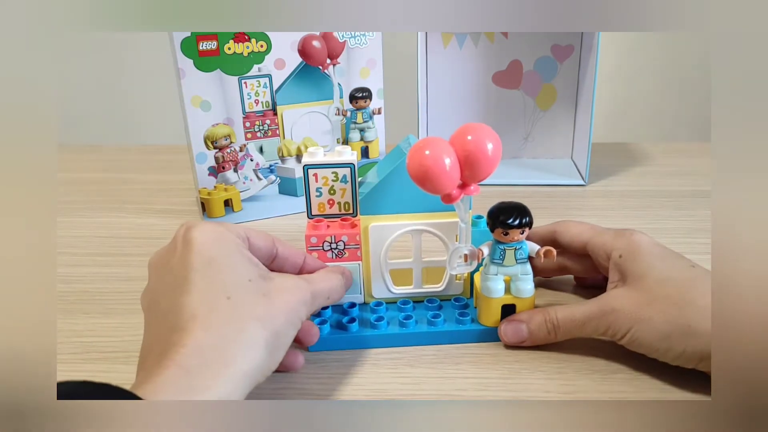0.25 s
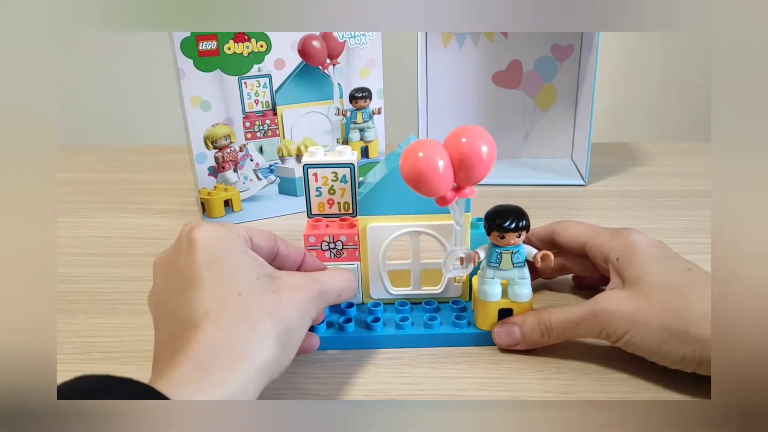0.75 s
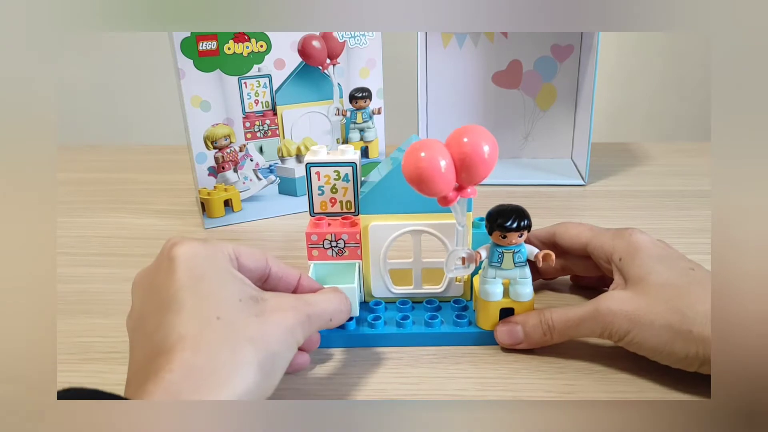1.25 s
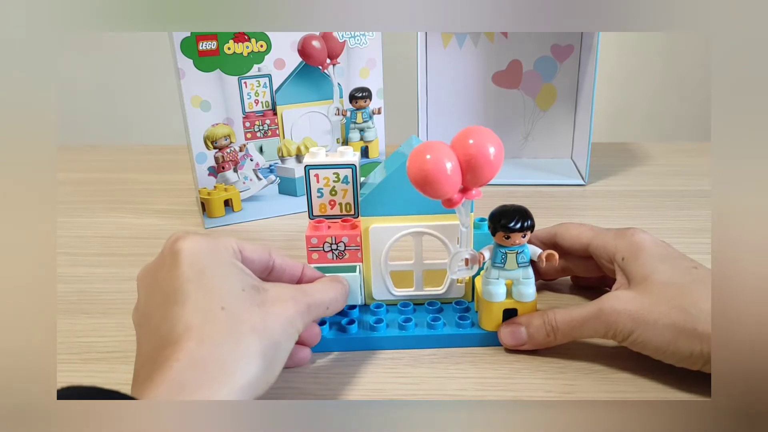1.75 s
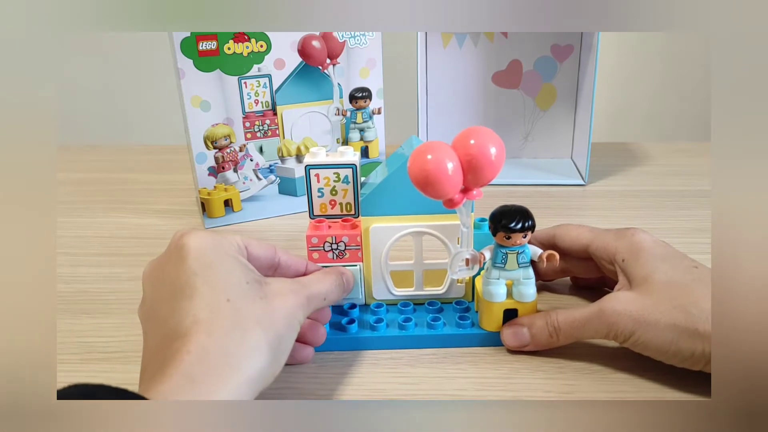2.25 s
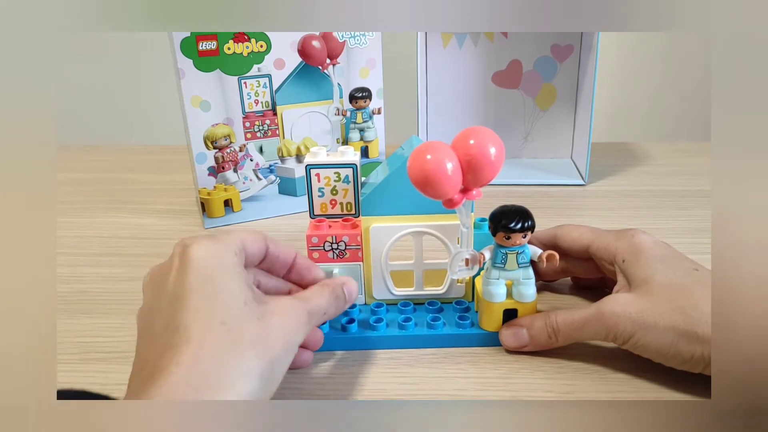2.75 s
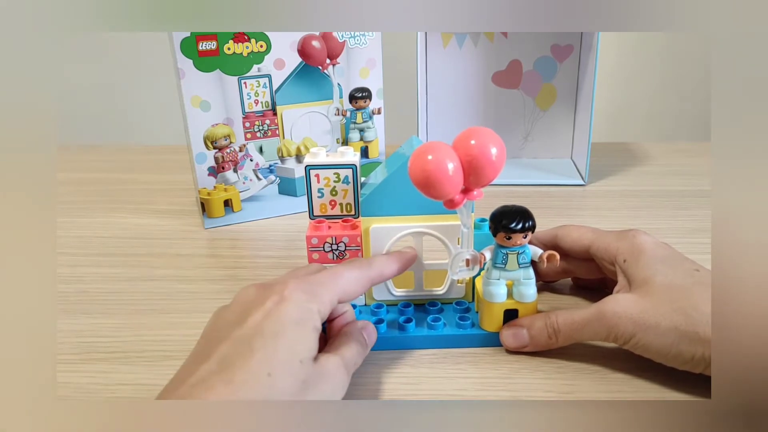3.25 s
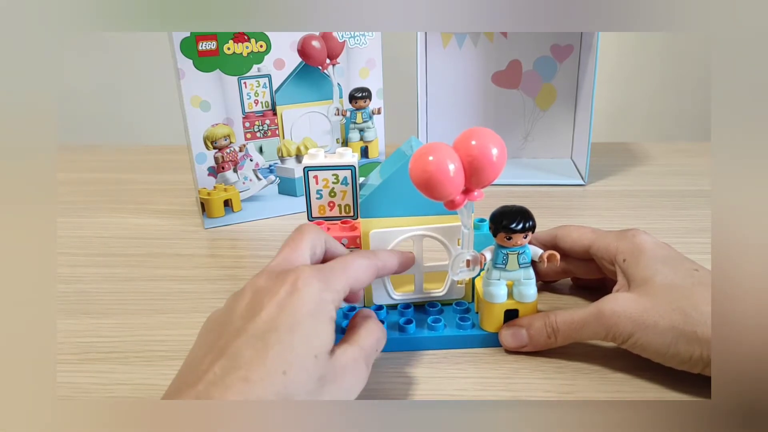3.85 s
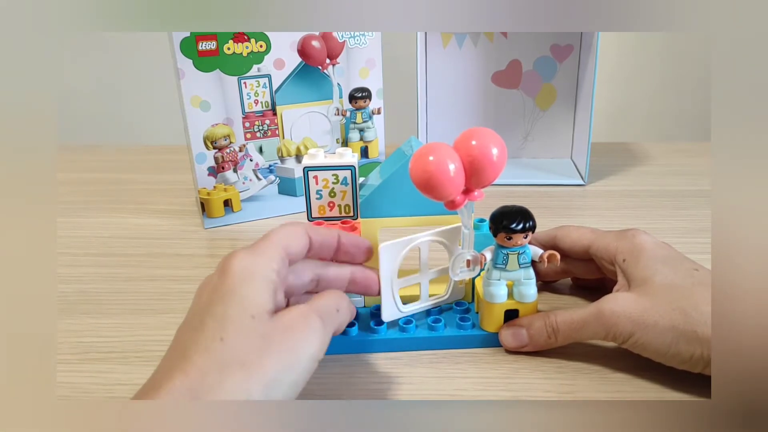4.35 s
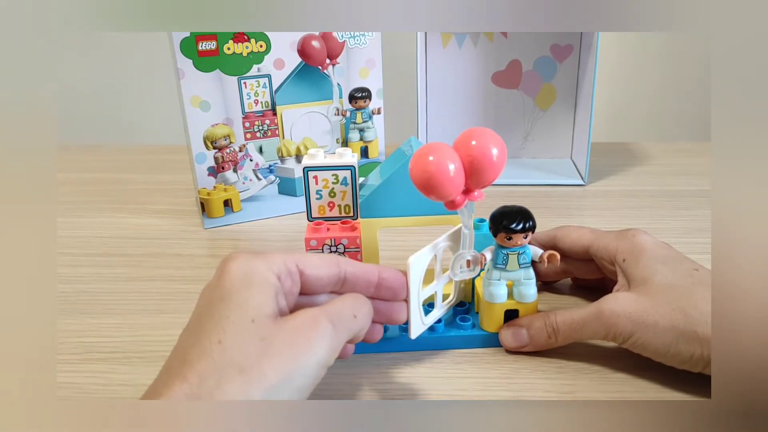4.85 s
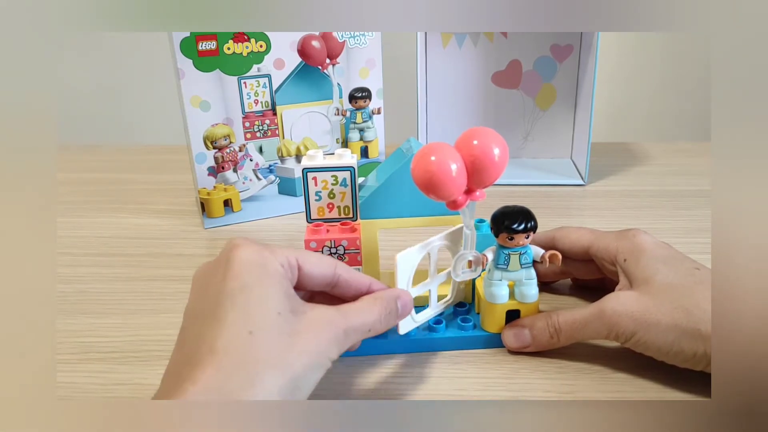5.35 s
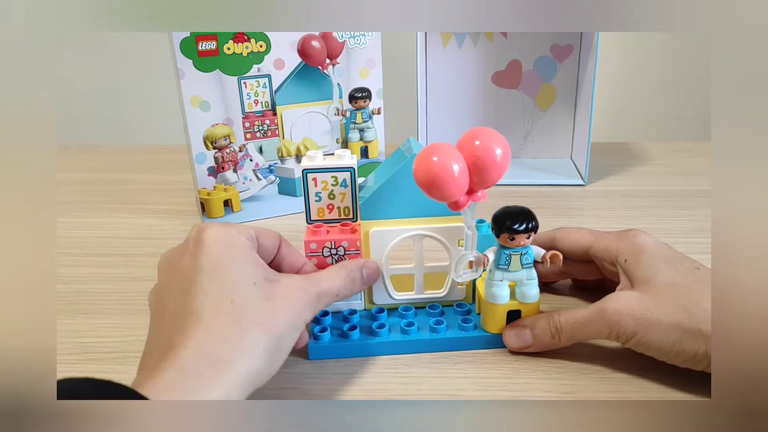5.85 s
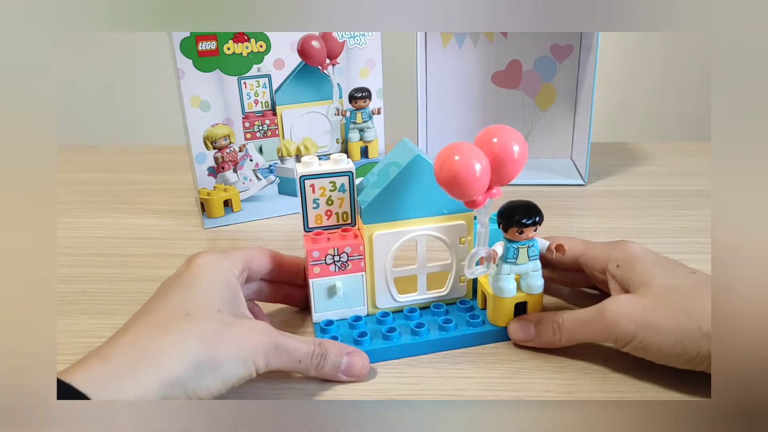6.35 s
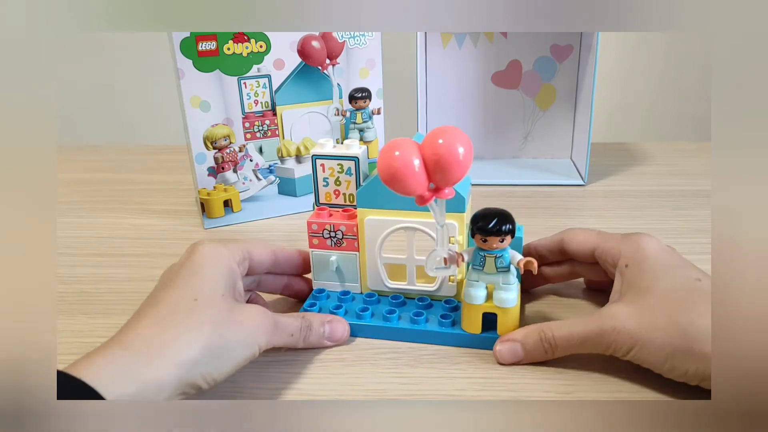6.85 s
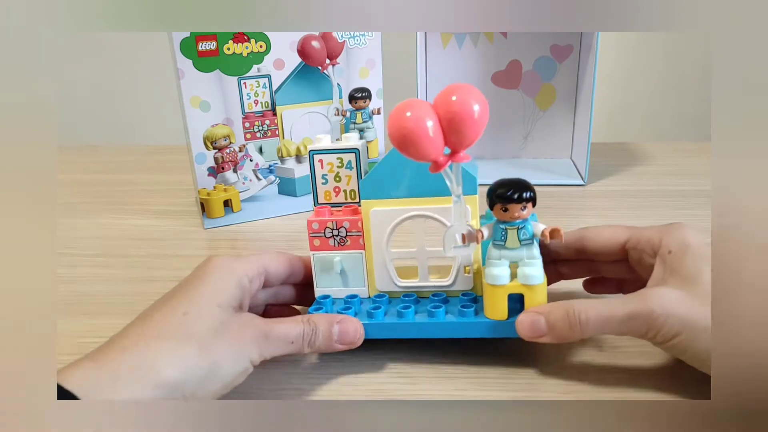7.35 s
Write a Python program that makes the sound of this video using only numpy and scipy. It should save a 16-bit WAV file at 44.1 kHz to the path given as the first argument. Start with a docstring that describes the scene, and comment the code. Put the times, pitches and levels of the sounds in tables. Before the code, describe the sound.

Hands handle a small plastic brick house on a wooden table: light clicks, a drawer thud, a creaking door popping open, faint hum and hiss.

```python
"""Hands play with a small house of plastic toy bricks on a wooden table, in a bare, lively room.
Contacts set the table, plate, walls, bricks and edges ringing as damped modes; a drawer thuds on its stop,
a pressed door groans and springs open, and the base plate skips over the table.
Fingers and sliding parts rub as shaped noise. Behind them lie a low hum, a thin whine and faint hiss;
all is heard through two microphone ports, each with its own resonance."""
import sys
import numpy as np
from scipy import signal
from scipy.fft import rfft, irfft, next_fast_len
from scipy.io import wavfile
from scipy.ndimage import uniform_filter1d, map_coordinates

SR = 44100
rng = np.random.default_rng(int(sys.argv[2]) if len(sys.argv) > 2 else 0)


def wav_out(sig):
    """Save sig, one row per channel (or a flat mono array), as 16-bit PCM at SR to the path in sys.argv[1]."""
    wavfile.write(sys.argv[1], SR, np.round(np.clip(np.atleast_2d(sig).T, -1, 1) * 32767).astype(np.int16))


N = 334895

# Contacts of the plastic parts. Each row: time in seconds, strength in dB before the trim of each part,
# hardness in dB (hard edge +, soft bump -), hollowness in dB (hollow wall +, solid rim -),
# wall mode of the touched spot in Hz, its level in dB, edge mode in Hz, its level in dB (before the spot trims).
TOUCHES = [(0.111, -76, 11, -6, 3380, -67.5, 7000, -71), (0.211, -71, -9, 6, 1150, -59.5, 7630, -80),
           (0.629, -63.5, 7, 1, 1770, -70, 7300, -62), (0.885, -73, 9.5, 11.5, 2920, -74, 4880, -73),
           (1.033, -55.5, 9, 0, 1230, -51, 4730, -59), (1.045, -47.5, 6.5, 2.5, 1170, -47, 8940, -53),
           (1.05, -42, 5, -1, 1150, -39, 4950, -47), (1.063, -41.5, 3.5, -4.5, 1150, -44.5, 7400, -43.5),
           (1.078, -56, 0, -6, 2140, -52, 7350, -60), (1.111, -58.5, 7, 8.5, 1000, -60, 7160, -64),
           (1.131, -50.5, 6.5, -1, 1920, -51, 7300, -52), (1.798, -59, -8, 2, 534, -58, 7500, -73),
           (1.815, -61.5, 1.5, -14, 563, -54, 5700, -65), (1.915, -66, 7, 14, 1150, -52.5, 6200, -67),
           (2.46, -64.5, 3, -13, 2830, -68, 4640, -67.5), (2.812, -74, -13, 10, 590, -67, 6520, -76),
           (3.618, -69, -10, 1, 644, -63, 5050, -85), (3.655, -66.5, -3, 5.5, 582, -58, 7550, -77),
           (3.919, -40.5, 3.5, -6, 1920, -39.5, 8760, -44), (4.017, -47.5, 2, -10, 1350, -49, 7630, -49),
           (4.034, -51.5, -3.5, 5.5, 815, -52, 5520, -54), (4.247, -63, -11, -10, 520, -52, 7600, -81),
           (4.308, -50.5, -5.5, 2.5, 1216, -39.5, 7200, -69), (4.324, -55, -6.5, 7.5, 626, -44, 4760, -66),
           (4.451, -69, 2, 9, 615, -63, 7730, -75), (4.477, -57, -4.5, 2.5, 985, -60, 8730, -70),
           (4.714, -45.5, -0.5, 9.5, 900, -46, 6200, -55), (5.41, -45.5, -0.5, 2.5, 1150, -46, 4560, -47),
           (5.435, -55.5, -15, -22, 970, -62, 5130, -64), (5.546, -56, 2, 11.5, 1620, -44.5, 4250, -55),
           (5.556, -52, -12, -13, 560, -43, 4200, -69), (5.631, -60, -7.5, 1, 510, -56, 7600, -70),
           (5.714, -63.5, -10.5, 7, 615, -52, 7280, -73), (5.734, -41.5, 10, -7, 3310, -45, 8380, -40),
           (6.082, -47.5, -4.5, -4.5, 635, -47, 5500, -63), (6.36, -50.5, 1.5, -16.5, 624, -57, 7050, -63),
           (6.605, -65, -15, -11, 615, -58, 6120, -73), (6.702, -55, -11, 1.5, 640, -65, 8700, -68),
           (6.93, -57, -5, -17, 1170, -61, 6530, -68), (6.963, -61.5, -2.5, 5.5, 1700, -55.5, 7560, -76),
           (7.069, -51, -10.5, -17, 520, -49, 7700, -62), (7.265, -45.5, 9.5, -11.5, 3250, -45, 8020, -47)]


def amp(db):
    """Decibels to gain."""
    return 10 ** (np.asarray(db) / 20)


def unit(x):
    """Scale to rms 1."""
    return x / np.sqrt(np.mean(x ** 2) + 1e-20)


def along(points, hz):
    """Read a curve of (Hz, value) points on a log frequency axis."""
    point_hz, value = np.transpose(points)
    return np.interp(np.log(hz + 1), np.log(point_hz + 1), value)


def wobble(rate):
    """A smooth random curve, rate knots a second."""
    knots = rng.standard_normal(int(N * rate / SR) + 4)
    return map_coordinates(knots, [np.arange(N) * rate / SR])


def filtered(x, response):
    """x through a complex response of frequency."""
    n = x.shape[-1]
    padded = next_fast_len(2 * n)
    hz = np.fft.rfftfreq(padded, 1 / SR)
    return irfft(rfft(x, padded) * response(hz), padded)[..., :n]


def resonance(hz, centre, width):
    """Causal response of one damped mode, 1 at its centre."""
    return 1j * hz * width / (centre ** 2 - hz ** 2 + 1j * hz * width)


def spread(pair):
    """Two unrelated signals as left and right: nearly mono around 150-300 Hz, far apart elsewhere."""
    # Each row: frequency in Hz, left-right correlation.
    likeness = [(30, 0.081), (150, 0.92), (300, 0.93), (600, 0.047), (1500, 0.14), (4000, 0.036)]

    def mid_side_gains(hz):
        angle = np.arccos(np.clip(along(likeness, hz), -1, 1)) / 2
        return np.array([np.cos(angle), np.sin(angle)])

    mid, side = filtered(pair, mid_side_gains)
    return np.array([mid + side, mid - side])


def noise(spectrum, grain_db):
    """Stereo noise of rms 1; grain_db sets how strongly fast level flutter breaks it into tiny slips."""
    slips = rng.standard_normal((2, N)) * amp(grain_db * wobble(400))
    return unit(spread(filtered(slips, lambda hz: amp(along(spectrum, hz)))))


def strokes(rows, rise_s, fall_s, rest_db):
    """Gain of a sliding sound: each stroke speeds up, holds and eases off; powers add over a resting level."""
    t, power = np.arange(N) / SR, amp(rest_db) ** 2
    for start, length, db in rows:
        speed_up = np.clip((t - start) / rise_s, 0, 1)
        ease_off = np.clip(.5 + (start + length - t) / fall_s, 0, 1)
        power = power + (amp(db) * speed_up * ease_off) ** 2
    return np.sqrt(power)


def ringing(modes, blows, contact_t60, rise, rattle_db, rattle_t60, vary_db):
    """A part rattled at each (s, dB) as left, right and all-round sound; a blow has the energy of 10 ms at its level."""
    size, all_round_delay = SR // 8, SR // 300
    t, out = np.arange(size) / SR, np.zeros((3, N + size))
    # the faces catch and let go in a burst of micro-impacts, then the loose joints chatter more softly
    burst = amp(-60 * t / contact_t60) + amp(rattle_db - 60 * t / rattle_t60)
    force = (1 - np.exp(-(t / rise) ** 2)) * burst
    blow = 1. * (np.arange(size) == all_round_delay)  # leaves room for the zero-phase ring ahead of its peak
    centre, width, mode_db = np.transpose(modes)[..., None]
    sign = (-1) ** np.arange(len(modes))[:, None]
    for s, db in blows:
        strengths = amp(mode_db + vary_db * rng.standard_normal(centre.shape))  # each spot favours other modes

        def each(hz):
            radiated = resonance(hz, centre, centre * 1.4)  # best near the mode's own pitch
            return strengths * resonance(hz, centre, width) * radiated

        impacts = spread(rng.standard_normal((2, size))) * force
        aimed = unit(filtered(impacts, lambda hz: (sign * each(hz)).sum(0)))
        # over all directions the burst acts as one blow and the modes add in power
        all_round = unit(filtered(blow, lambda hz: np.linalg.norm(each(hz), axis=0)))
        level = amp(db) * np.sqrt(.01 * SR / size)
        out[:, round(s * SR):][:, :size] += level * np.vstack([aimed, all_round])
    return out[:, :N]


def struck(modes, blows, soft_s):
    """A panel hit cleanly at each (s, dB): left, right and all-round; left and right carry 10 ms at that rms."""
    size = SR // 4
    t, out = np.arange(size) / SR, np.zeros((3, N + size))
    centre, width, ahead_db, around_db = np.transpose(modes)[..., None]
    sign = (-1) ** np.arange(len(modes))[:, None]
    for s, db in blows:
        ports_db = ahead_db + rng.standard_normal((2, len(modes), 1))  # each port sees the modes a little differently
        strengths = sign * amp(np.concatenate([ports_db, around_db[None]]))

        def panel(hz):
            radiated = resonance(hz, centre, centre)
            return (strengths * resonance(hz, centre, width) * radiated).sum(1)

        ring = filtered(np.exp(-t / soft_s), panel)
        rms_10ms = np.sqrt(np.sum(ring[:2] ** 2) / 2 / (.01 * SR))
        out[:, round(s * SR):][:, :size] += amp(db) * ring / rms_10ms
    return out[:, :N]


def excitation(own_db, hard_share, hollow_share):
    """(s, dB) of one part at every contact: its trim plus its shares of the hardness and hollowness."""
    s, strength_db, hard_db, hollow_db, *_ = np.transpose(TOUCHES)
    return zip(s, strength_db + own_db + hard_share * hard_db + hollow_share * hollow_db)


def background():
    """A low hum that fills the room, a thin, unsteady whine of narrow noise and the microphone's hiss."""
    # Spectra. Each row: frequency in Hz, relative level in dB per Hz.
    hum_spectrum = [(10, 2.5), (28, 0.5), (60, -14.5), (110, -10), (170, -5.5), (228, 8.5), (275, -2.5),
                    (330, -1), (500, -12.5), (800, -18), (1500, -28), (3000, -32.5), (6000, -73)]
    hiss_spectrum = [(300, -28), (2000, 7), (5000, 9.5), (8000, -0.5), (9500, -50), (10500, 8.5),
                     (12500, 19), (13500, -53)]
    hum = amp(-54.5 + 1.3 * wobble(13)) * noise(hum_spectrum, grain_db=-2.5)
    # two passes through one resonance, 90 Hz wide per pass
    whine = unit(filtered(rng.standard_normal(N), lambda hz: resonance(hz, 1600, 90) ** 2))
    hiss = noise(hiss_spectrum, grain_db=1.5)
    return hum + amp(-77.5) * whine + amp(-77.0) * hiss


def room(x, build):
    """The diffuse answer of the walls as decaying noise, drawn afresh each quarter second."""
    # Each row: frequency in Hz, time to fall 60 dB in seconds.
    decay = [(100, 0.41), (300, 0.74), (700, 0.63), (2000, 0.7), (4000, 0.63), (8000, 0.56), (12000, 0.23)]
    size, step = SR * 3 // 4, SR // 4
    out = np.zeros((2, N + size + step))
    age = np.arange(size) / SR
    early = amp(-9.5) * np.exp(-age / 0.022)  # first answers of the table and near walls
    swell = (1 - np.exp(-age / build)) * (1 + early)
    for start in range(0, N, step):
        hz, t, z = signal.stft(rng.standard_normal((2, size)), SR, nperseg=256)
        t60 = along(decay, hz)[:, None]
        fading = z * amp(-60 * t / t60) / np.sqrt(t60)
        tail = signal.istft(fading, SR, nperseg=256)[1][:, :size]
        tail = unit(spread(tail) * swell) / np.sqrt(size)
        answer = signal.fftconvolve(x[None, start:start + step], tail, axes=1)
        out[:, start:start + answer.shape[1]] += answer
    return out[:, :N]


def standing_waves(x):
    """The room keeps ringing at a few pitches of its own, alike at both ports."""
    # Each row: frequency in Hz, width in Hz, gain in dB.
    room_tones = [(243.5, 3.1, 13), (298, 2.5, 9), (343, 2.4, 1), (380, 2.3, 5), (413, 4, 7.5),
                  (475, 4.4, 9), (525, 1.5, 6), (604, 3.1, 2.5), (899, 3.7, 4), (974, 6.3, 3),
                  (1009, 6.2, 0), (1177, 2.4, 3.5)]
    return filtered(x, lambda hz: sum(amp(db) * resonance(hz, centre, width) for centre, width, db in room_tones))


def rubbing():
    """Fingertips whisper over the plastic as noise; the holding hand never quite rests."""
    # Each row: start in seconds, length in seconds, level in dB before the trim below.
    rub_strokes = [(0, 0.97, -69.5), (.51, 0.23, -58), (.92, 0.31, -60.5), (1.35, 0.48, -63.5),
                   (2.05, 0.44, -67), (2.75, 0.24, -56.5), (3.31, 0.1, -60), (3.66, 0.19, -73),
                   (4.47, 0.16, -61), (5.1, 0.37, -66), (5.45, 0.77, -60.5), (6.25, 0.26, -62.5),
                   (6.5, 0.73, -58.5), (7.0, 0.61, -57.5)]
    # Each row: frequency in Hz, relative level in dB per Hz.
    skin_spectrum = [(600, -31.5), (1500, -7.5), (3000, -4.5), (5000, -7.5), (7400, -0.5), (9200, -8.5),
                     (11000, -19), (15000, -7)]
    gain = strokes(rub_strokes, rise_s=0.056, fall_s=0.099, rest_db=-73.5)
    uneven = amp(-6.0 + 1.3 * wobble(25))  # trim and wavering level
    return gain * uneven * noise(skin_spectrum, grain_db=1.5)


def chafing():
    """A fingertip chafes on the door: rough slips stir the resonances of its pane."""
    # Each row: start in seconds, length in seconds, level in dB.
    chafe_strokes = [(3.315, 0.056, -66), (3.36, 0.051, -59.5)]
    # Each row: frequency in Hz, width in Hz of each of two passes, relative level in dB.
    pane_modes = [(1000, 210, 4.5), (1950, 284, -3.5), (2540, 530, -6.5), (3380, 270, -6), (4660, 400, -5),
                  (5030, 520, -8)]

    def pane(hz):
        return sum(amp(db) * resonance(hz, centre, width) ** 2 for centre, width, db in pane_modes)

    slips = rng.standard_normal((2, N)) * amp(2.7 * wobble(300))
    return strokes(chafe_strokes, rise_s=0.021, fall_s=0.025, rest_db=-110) * unit(filtered(slips, pane))


def dragging():
    """Drawer, hinge and base plate drag in uneven slips, a low scraping body and a brighter grit."""
    # Each row: start in seconds, length in seconds, body in dB, grit in dB (both before the trim below).
    drag_strokes = [(0.488, 0.24, -64.5, -63.5), (1.014, 0.1, -51, -55), (1.757, 0.089, -59, -68),
                    (4.03, 0.59, -59.5, -66), (4.93, 0.39, -58.5, -81), (5.373, 0.094, -46, -54),
                    (5.49, 0.19, -55, -57.5), (5.667, 0.045, -44, -56), (6.556, 0.32, -55.5, -70),
                    (7.03, 0.37, -59, -63.5), (7.145, 0.05, -45, -61)]
    # Spectra. Each row: frequency in Hz, relative level in dB per Hz.
    body_spectrum = [(150, -6.5), (350, 3.5), (540, 3), (750, -8), (1100, -9.5), (1400, -13.5),
                     (1750, -7.5), (2600, -24.5), (5000, -19.5), (10000, -30)]
    grit_spectrum = [(400, -22), (750, -9.5), (1100, -2.5), (1400, -9.5), (1750, -2.5), (2400, -9.5),
                     (4000, -24), (8000, -29.5)]
    rise_s, fall_s = 0.03, 0.068
    start, length, body_db, grit_db = np.transpose(drag_strokes)
    # the held toy shifts a little all the time, hence the resting levels
    body_gain = strokes(zip(start, length, body_db), rise_s, fall_s, rest_db=-71.5)
    grit_gain = strokes(zip(start, length, grit_db), rise_s, fall_s, rest_db=-83.5)
    body = body_gain * noise(body_spectrum, grain_db=1.5)
    grit = grit_gain * noise(grit_spectrum, grain_db=3.0)
    return amp(-3.5 + 2.16 * wobble(35)) * (body + grit)


def groans(waver, rough_db):
    """Pressed plastic sticks and slips near the pitch of one of its modes, sliding and never steady."""
    # Pressed door, its hinge and the base plate. Each row: start in seconds, length in seconds, middle pitch in Hz,
    # glide as a share of the pitch, level in dB before the trims in scene(), dB per overtone.
    stick_slips = [(3.94, 0.17, 769, 0.03, -52.5, -6), (4.035, 0.093, 420.7, 0.02, -48, -6),
                   (4.04, 0.26, 1670, -.05, -59, -20), (4.07, 0.07, 528, -.04, -52.5, -20),
                   (4.183, 0.08, 508.6, 0.052, -47.5, -32), (4.318, 0.06, 611, 0.086, -50, -9.5),
                   (4.535, 0.13, 346, -0.039, -52, -20), (6.593, 0.053, 607, 0.03, -50.5, -19),
                   (6.7, 0.072, 1134, 0.024, -56, -26), (7.057, 0.053, 470, 0.063, -44, -27),
                   (7.158, 0.1, 295.5, -0.049, -41.5, -10)]
    changes_per_s = 170
    t, out = np.arange(N) / SR, np.zeros(N)
    overtone = np.arange(5)[:, None]
    for s, length, hz, glide, db, fall_db in stick_slips:
        u = (t - s) / length
        on = (u > 0) & (u < 1)
        u, slips = u[on], np.arange(on.sum()) * changes_per_s / SR

        def unsteady():
            return map_coordinates(rng.standard_normal(changes_per_s), [slips], mode="mirror")

        pitch = hz * (1 + glide * (u - .5) + waver * unsteady())
        phase = 2 * np.pi * np.cumsum(pitch) / SR
        pressure = np.sqrt(np.sin(np.pi * u)) * (1.5 - u)
        tone = (amp(fall_db * overtone) * np.sin((overtone + 1) * phase)).sum(0)
        out[on] += amp(db + rough_db * unsteady()) * pressure * tone
    return out


def judder():
    """The base plate skips over the table as it is pulled up, each skip a soft blow on its modes."""
    # Each row: frequency in Hz, width in Hz, dB towards the microphone, dB into the room.
    base_modes = [(283, 55, 3, -3), (377, 41, 3.5, -6.5), (865, 100, -22, -11), (1620, 73, -7, -4)]
    # Each row: time in seconds, level in dB.
    skips = [(7.177, -37.5), (7.187, -38.5), (7.203, -38), (7.229, -42), (7.239, -48), (7.263, -43.5)]
    plate = struck(base_modes, skips, soft_s=0.00054)
    return plate[:2], plate[2]


def drawer():
    """The little drawer thuds against its stop and shakes the house, ringing in low modes."""
    # Each row: frequency in Hz, width in Hz, dB towards the microphone, dB into the room before the feed trim.
    drawer_modes = [(82, 14, -5, -2), (173, 25, -4.5, -13), (263, 23, -4, 5), (560, 130, 1, -6),
                    (2200, 230, -13, 4)]
    # Each row: time in seconds, level in dB.
    stops = [(1.0593, -37), (1.132, -48.5)]
    box = struck(drawer_modes, stops, soft_s=0.00015)
    return box[:2], amp(-7.5) * box[2]


def door():
    """The door jumps out of its catch: the catch rasps briefly, the panel knocks and slaps the frame once more."""
    # Each row: frequency in Hz, width in Hz, dB towards the microphone, dB into the room before the feed trim.
    panel_modes = [(245, 27, -16, -11.5), (354, 51, -6, -3), (451, 75, -6.5, -8), (576, 78, 0, -4),
                   (896, 38, -3, -6), (1002, 63, -6, -8), (1170, 100, -6.5, -12), (1575, 135, -9.5, -13),
                   (1938, 81, -6.5, -8), (2220, 150, -25, -9), (2620, 260, -3.5, -16.5),
                   (3195, 300, -7.5, -12)]
    # Each row: frequency in Hz, width in Hz, relative level in dB.
    catch_modes = [(4320, 1000, 1.5), (4950, 1600, -3.5), (6100, 1400, -2), (7400, 480, -2.5),
                   (8460, 540, 1.5), (14000, 1300, -15.5)]
    open_s, catch_lead_s, rebound_s = 4.7435, 0.0015, 0.0068
    panel = struck(panel_modes, [(open_s, -20), (open_s + rebound_s, -31)], soft_s=0.00003)
    catch = ringing(catch_modes, [(open_s - catch_lead_s, -25)], contact_t60=0.015, rise=0.0025,
                    rattle_db=-12, rattle_t60=0.048, vary_db=1.0)
    return panel[:2] + catch[:2], amp(1.7) * panel[2] + amp(-5.5) * catch[2]


def spots():
    """The touched spot sings briefly in one wall mode and one edge mode, blurred by the chattering contact."""
    size = SR // 8
    attack_s, wall_t60, edge_t60 = 0.0021, 0.044, 0.018
    wall_blur, edge_blur = 0.05, 0.11  # line width as a share of the pitch
    t, out = np.arange(size) / SR, np.zeros((3, N + size))
    for s, *_, wall_hz, wall_db, edge_hz, edge_db in TOUCHES:
        wall = (wall_hz, wall_db, wall_t60, wall_blur)
        edge = (edge_hz, edge_db, edge_t60, edge_blur)
        for hz, db, t60, blur in (wall, edge):
            apart = min(1, hz / 4000) * rng.uniform(-np.pi, np.pi, (3, 1))  # short waves reach the ports out of step
            jitter = uniform_filter1d(rng.standard_normal(size), size=24)
            chatter = np.cumsum(jitter) * np.sqrt(2 * np.pi * blur * hz / SR)  # random drift of the phase
            envelope = unit((1 - np.exp(-(t / attack_s) ** 2)) * amp(-60 * t / t60))
            ring = envelope * np.sqrt(2) * np.sin(2 * np.pi * hz * t + apart + chatter)
            out[:, round(s * SR):][:, :size] += amp(db) * ring * np.sqrt(.01 * SR / size)
    return amp(-1.0) * out[:2, :N], amp(-5.5) * out[2, :N]


def contacts():
    """Table, plate, walls, bricks and edges ring at each contact; the edges send less of their sound into the room."""
    # Modes of each part. Each row: frequency in Hz, width in Hz, relative level in dB.
    table_modes = [(87, 97, -18), (148.6, 8, -3), (244.5, 29, -1.5), (299, 14, -0.5), (417, 145, -13)]
    plate_modes = [(470, 180, -15.5), (612, 18, -3), (690, 94, -20.5)]
    wall_modes = [(920, 110, 1.5), (1037, 37, 4), (1150, 97, 2.5), (1443, 400, -4.5), (1670, 110, -6)]
    brick_modes = [(1960, 260, 5.5), (2120, 510, 2), (2350, 690, -1), (2947, 210, -0.5), (3380, 180, -2.5)]
    edge_modes = [(4440, 1100, 1.5), (5000, 1300, 1), (6200, 1140, 1), (7540, 1030, -3), (8520, 1100, -4.5),
                  (13500, 3600, -5)]
    thump = ringing(table_modes, excitation(own_db=-2.1, hard_share=-0.89, hollow_share=0.061),
                    contact_t60=0.0098, rise=0.0025, rattle_db=-17, rattle_t60=0.08, vary_db=3)
    knock = ringing(plate_modes, excitation(own_db=-2.9, hard_share=-1.15, hollow_share=0.57),
                    contact_t60=0.005, rise=0.0009, rattle_db=-18, rattle_t60=0.12, vary_db=3)
    clack = ringing(wall_modes, excitation(own_db=-0.91, hard_share=-0.071, hollow_share=0.69),
                    contact_t60=0.021, rise=0.0012, rattle_db=-8, rattle_t60=0.066, vary_db=3)
    click = ringing(brick_modes, excitation(own_db=-1.74, hard_share=0.62, hollow_share=0.91),
                    contact_t60=0.041, rise=0.0021, rattle_db=-28.5, rattle_t60=0.055, vary_db=3)
    snap = ringing(edge_modes, excitation(own_db=0, hard_share=1, hollow_share=0),
                   contact_t60=0.012, rise=0.0033, rattle_db=-25, rattle_t60=0.034, vary_db=3)
    direct = amp(-0.5) * thump + amp(0.5) * knock + amp(3.0) * clack + amp(0.5) * click + amp(-2.5) * snap
    feed = amp(0.0) * thump + amp(-5.0) * knock + amp(-0.5) * clack + amp(-2.0) * click + amp(-7.5) * snap
    return direct[:2], feed[2]


def scene():
    """The toy and the hands close to the microphone, and the room's answer around them."""
    # Each row: frequency in Hz, diffuse share of the room in dB.
    diffuse_share = [(150, -0.5), (240, -1.5), (600, 2), (750, 4.5), (950, 4), (1400, -2), (3000, -0.5)]
    blows = (contacts(), spots(), drawer(), door(), judder())
    direct, feed = (sum(parts) for parts in zip(*blows))
    sliding = rubbing() + dragging() + chafing()
    groan = groans(waver=0.028, rough_db=5)
    feed = feed + amp(-4.0) * sliding[0] + amp(-5.0) * groan
    diffuse = room(filtered(feed, lambda hz: amp(along(diffuse_share, hz))), build=0.00038)
    close = direct + sliding + amp(-3.5) * groan
    return close + diffuse + standing_waves(feed) + background()


def record(dry):
    """Each port rings at its own pitch; the left hears more bass, a moment later; treble is soft above 10 kHz."""
    # Left port, then right. Each row: resonance in Hz, width in Hz, level in dB.
    port_modes = [(8730, 570, 12.5), (7500, 670, 9)]
    # Each row: frequency in Hz, left minus right in dB, ahead of the port resonances.
    left_right = [(100, 4.5), (300, 4), (600, 3), (1100, 2.5), (2200, -0.5), (4500, -3), (6500, -5),
                  (8000, -5), (9000, -1.5), (12000, -1)]

    def microphones(hz):
        side = np.array([[.5], [-.5]])
        ports = np.array([1 + (amp(db) - 1) * resonance(hz, centre, width) for centre, width, db in port_modes])
        lag = np.exp(-2j * np.pi * hz * side * 0.00016)  # seconds between the ports
        return ports * lag * amp(side * along(left_right, hz))

    def soft_treble(hz):
        return amp(along([(9700, -0.5), (10600, -10.5), (14000, -17.5)], hz))

    def band_limit(hz):
        return 1 / (1 + (hz / 15700) ** 60)

    return filtered(dry, lambda hz: microphones(hz) * soft_treble(hz) * band_limit(hz))


dry = scene()
out = record(dry)
wav_out(out)
```